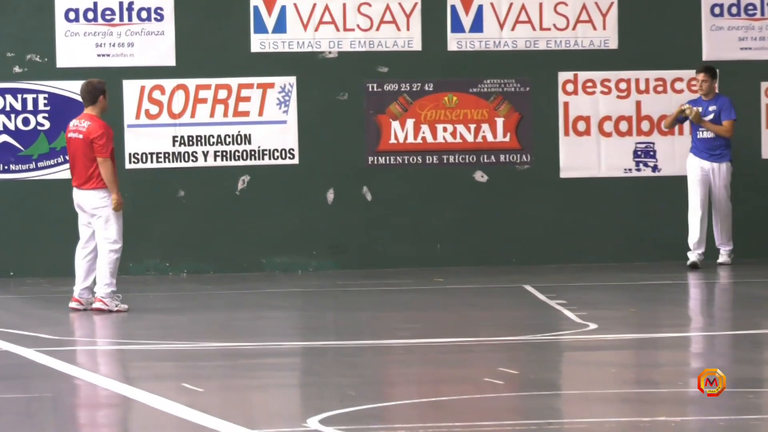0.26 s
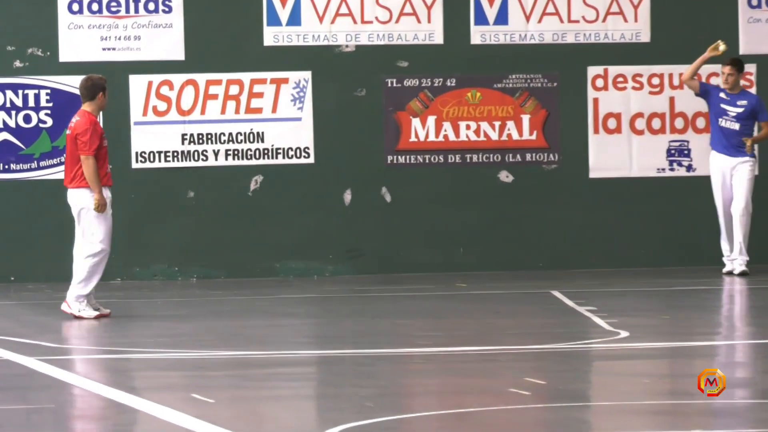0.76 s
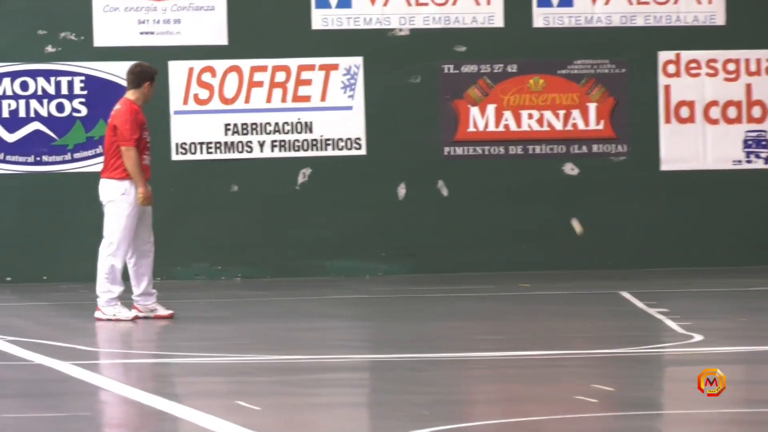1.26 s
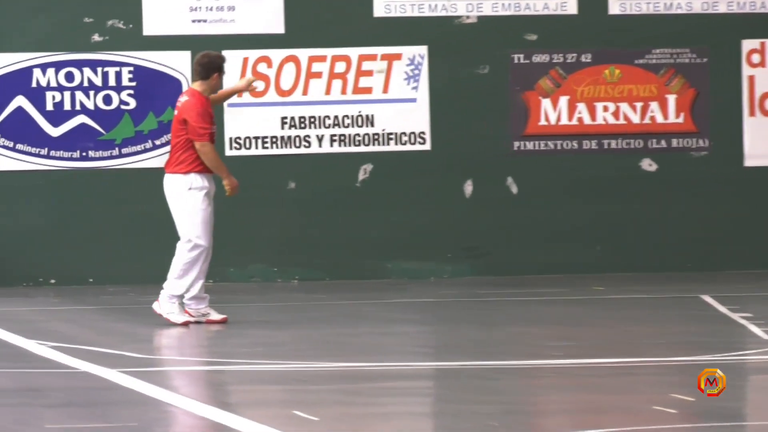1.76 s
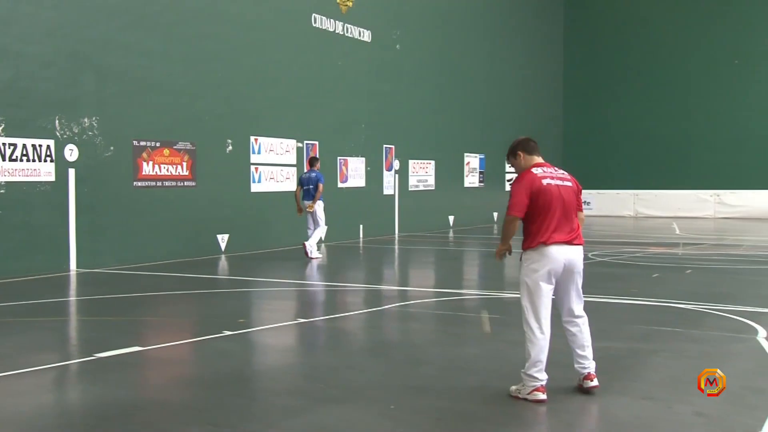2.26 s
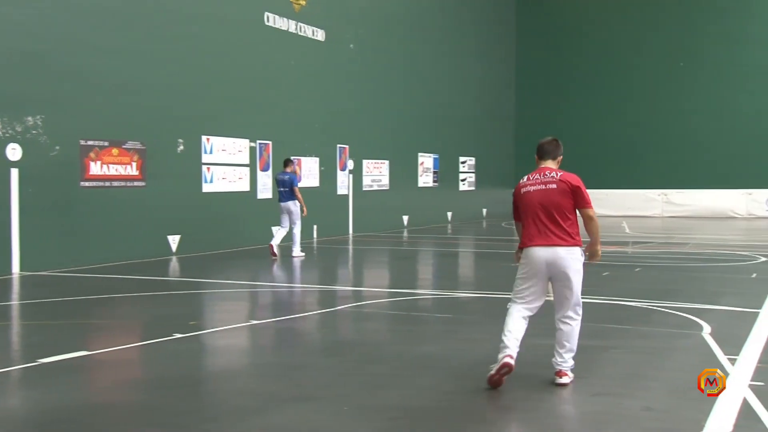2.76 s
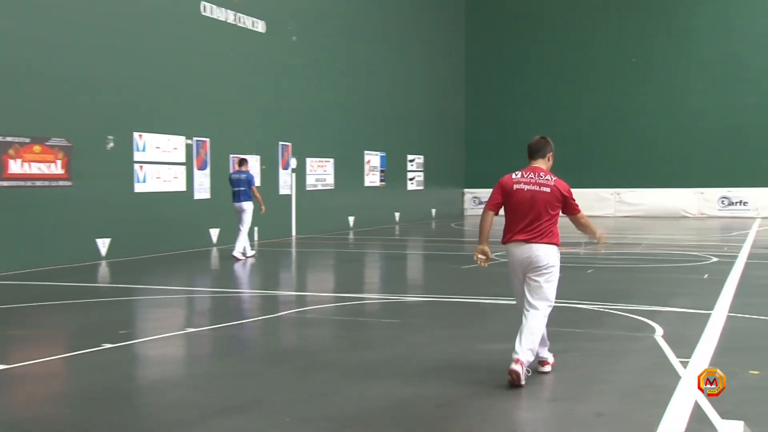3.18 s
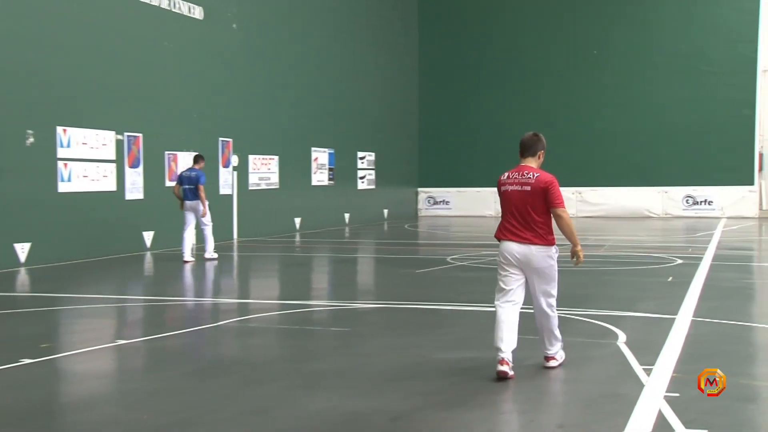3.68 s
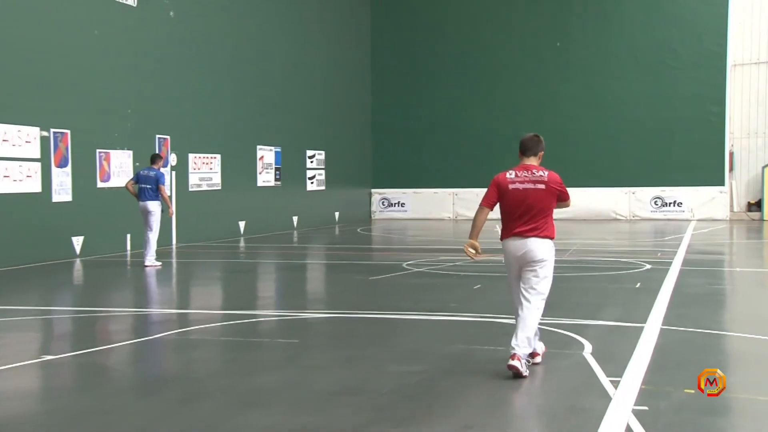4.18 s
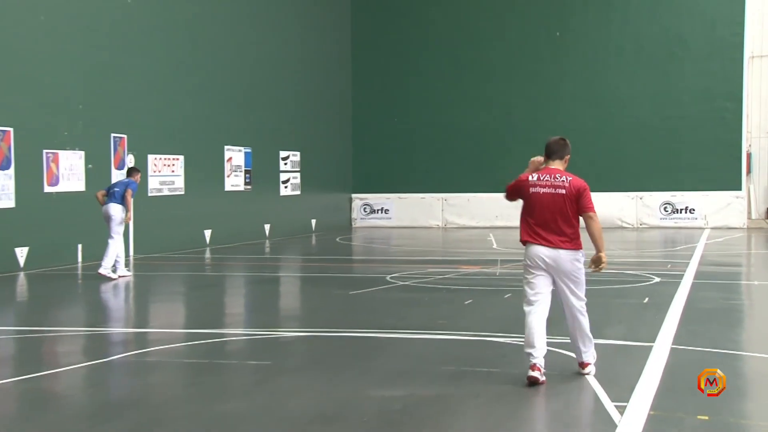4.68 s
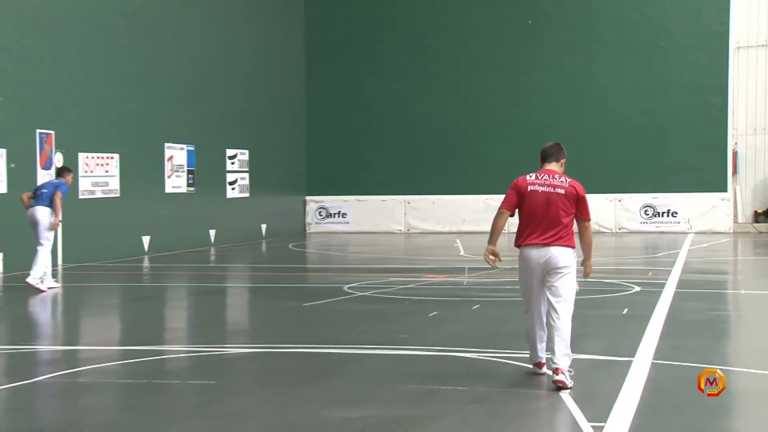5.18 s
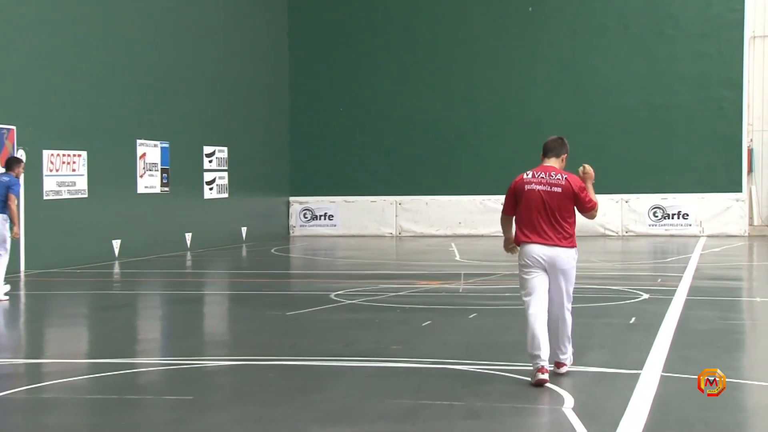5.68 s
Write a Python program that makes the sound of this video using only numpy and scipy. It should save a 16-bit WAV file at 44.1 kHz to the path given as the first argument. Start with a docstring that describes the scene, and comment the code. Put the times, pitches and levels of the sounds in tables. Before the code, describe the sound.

A hard ball bounces seven times on a court floor, each sharp crack echoing and ringing through a very large hall.

```python
"""Seven sharp cracks, each over a low thump: a hard handball bounced in a very large walled court.
The bare walls slap each bounce back, it flutters across the court off the stepped stands with a
falling chirp, and the hall rings for seconds. Soft shoe sounds come before the first bounce.
One microphone, with faint hum, hiss and rumble throughout."""
import sys
import numpy as np
from scipy import signal
from scipy.fft import rfft, irfft, next_fast_len
from scipy.io import wavfile

SR = 44100
rng = np.random.default_rng(int(sys.argv[2]) if len(sys.argv) > 2 else 0)


def store_pcm(level_fs):
    """Save levels as 16-bit WAV."""
    pcm = np.round(np.clip(level_fs, -1, 1) * 32767).astype(np.int16)
    wavfile.write(sys.argv[1], SR, np.atleast_2d(pcm).T)


N = 261513
TIME = np.arange(N) / SR
CUTOFF_HZ = 16000

# Ball on the floor. Each row: start in seconds, force in dB, crack in dB, second snap in dB,
# crack pitch in Hz, bright splash in dB, thump in dB.
BOUNCES = [(1.35, 0, -2, -34, 4190, -38.5, -33), (2.306, -1.56, -6.5, -11, 3900, -42.5, -34.5),
           (2.8030, -2.2, -10, -16, 3980, -44, -26.5), (3.2890, -.5, -5, -7, 3790, -38.5, -29.5),
           (3.840, 2, -5, -6.5, 3970, -28, -31), (4.5023, 1, -11, -10.5, 4420, -33.5, -32.5),
           (5.002, -8.5, -20, -19.5, 4200, -54, -33)]
# Echo delays. Each row, one per bounce: side wall in seconds, stands in seconds.
ECHO_DELAYS = [(.0255, .0575), (.0217, .0607), (.0207, .0588), (.0204, .058), (.021, .0569), (.011, .0547),
               (.02, .0546)]
# Spectrum of a slap off a flat wall. Each row: frequency in Hz, level in dB.
SLAP_COLOUR = [(100, -23), (800, -6.5), (2000, -26), (3000, -3.5), (4300, 7), (5500, -1.5), (7000, -22),
               (8500, -23), (11000, -35), (15000, -86)]


def cracks(lead_s=0.0019, lead_db=-13, snap_s=0.0028, grit_db=-23, grit_t60_s=0.044, nominal_hz=4200,
           smear_s=0.00006, ring_db=-15, ring_t60_s=0.023, ring_rise_s=0.00078):
    """Ball hits floor: a light tick, the main crack, a second snap and a short gritty ring."""
    # Crack spectrum at nominal_hz. Each row: frequency in Hz, level in dB.
    crack_colour = [(100, -35), (400, -11.5), (850, -11), (1300, -12), (2000, -11), (3000, -2), (4200, 7),
                    (5500, -1), (7000, -13), (8500, -19.5), (11000, -28), (15000, -48)]
    out, t = np.zeros(N), TIME[:SR // 10]
    for start_s, _, crack_db, snap_db, pitch_hz, *_ in BOUNCES:
        colour = [(hz * pitch_hz / nominal_hz, db) for hz, db in crack_colour]  # shorter contact: higher
        pulse = click(colour, smear_s)
        ring = np.sin(2 * np.pi * pitch_hz * t) * fade(t, ring_t60_s) * rise(t, ring_rise_s)
        add(out, start_s - lead_s, from_db(crack_db + lead_db) * pulse)
        add(out, start_s, from_db(crack_db) * pulse)
        add(out, start_s + snap_s, from_db(snap_db) * pulse)
        add(out, start_s, from_db(crack_db + ring_db) * ring)
        add(out, start_s, from_db(crack_db + grit_db) * scatter(colour, grit_t60_s))
    return out


def floor_thumps(lead_s=0.00773, rise_s=0.0044, boom_db=-15, boom_t60_s=1.0, boom_rise_s=0.0014,
                 far_s=0.21, far_db=-41, far_t60_s=0.18):
    """A low thump with each bounce, a boom off near walls, then a dull far knock."""
    # Floor modes. Each row: frequency in Hz, level in dB, T60 in seconds.
    floor_modes = [(112, -32, 0.31), (191, -1.5, 0.068), (293, 3.5, 0.05), (353, 3.5, 0.038)]
    # Spectra of the near-wall boom and the dull far-end knock. Each row: frequency in Hz, level in dB.
    boom_colour = [(35, -5.5), (75, 2), (170, -1.5), (380, -3), (700, -5), (3000, -64)]
    far_colour = [(60, -18), (200, 7.5), (330, 10), (500, 8), (900, -19), (1600, -25), (5000, -57)]
    out, t = np.zeros(N), TIME[:SR]
    body = sum(from_db(db) * np.sin(2 * np.pi * hz * t) * fade(t, t60_s) for hz, db, t60_s in floor_modes)
    for start_s, *_, thump_db in BOUNCES:
        add(out, start_s - lead_s, from_db(thump_db) * body * rise(t, rise_s))
        add(out, start_s, from_db(thump_db + boom_db) * scatter(boom_colour, boom_t60_s, boom_rise_s))
        add(out, start_s + far_s, from_db(far_db) * scatter(far_colour, far_t60_s, rise_s))
    return out


def ball_knocks(knock_hz=840, knock_db=-27, t60_s=0.04, rise_s=0.00097):
    """The ball's own short hollow note, scaled with the crack."""
    out, t = np.zeros(N), TIME[:SR // 5]
    note = np.sin(2 * np.pi * knock_hz * t) * fade(t, t60_s) * rise(t, rise_s)
    for start_s, _, crack_db, *_ in BOUNCES:
        add(out, start_s, from_db(crack_db + knock_db) * note)
    return out


def wall_slaps(end_s=0.0412, corner_extra_s=0.0383, corner_db=-21.5, scatter_db=-18, scatter_t60_s=0.029,
               smear_s=0.000092, side_db_per_oct=3, end_db_per_oct=-3):
    """Thin slaps off the side wall, the end wall and, by way of the stands, the corner."""
    # Slap peaks. Each row, one per bounce: side wall in dB, end wall in dB.
    wall_peaks = [(-12, -16), (-17, -29), (-13.5, -26), (-15.5, -11), (-29, -8), (-14, -23), (-30, -15.5)]
    out = np.zeros(N)
    for bounce, (side_s, stands_s), (side_db, end_db) in zip(BOUNCES, ECHO_DELAYS, wall_peaks):
        start_s, force_db, *_ = bounce
        paths = [(side_s, side_db, lifted(SLAP_COLOUR, side_db_per_oct)),
                 (end_s, end_db, lifted(SLAP_COLOUR, end_db_per_oct)),
                 (stands_s + corner_extra_s, force_db + corner_db, SLAP_COLOUR)]
        for delay_s, peak_db, colour in paths:
            add(out, start_s + delay_s, from_db(peak_db) * click(colour, smear_s))
            add(out, start_s + delay_s, from_db(peak_db + scatter_db) * scatter(colour, scatter_t60_s))
    return out


def stray_slaps(first_s=0.03, last_s=0.14, base_db=-22.5, spread_db=3, loss_db_per_s=15,
                lift_db_per_oct=9, smear_s=0.0001, count=10):
    """Beams, ledges and railings throw back small crisp copies of the crack at random delays."""
    out, pulse = np.zeros(N), click(lifted(SLAP_COLOUR, lift_db_per_oct), smear_s)
    for start_s, force_db, *_ in BOUNCES:
        for _ in range(count):
            delay_s = rng.uniform(first_s, last_s)
            peak_db = base_db + force_db + rng.uniform(-2 * spread_db, 0) - loss_db_per_s * delay_s
            add(out, start_s + delay_s, from_db(peak_db) * pulse)
    return out


def flutter(round_trip_s=0.0803, trip_loss_db=27, scatter_db=-22, scatter_tracking=0.3,
            scatter_t60_s=0.057, smear_s=0.000063, chirp_loss_db=11, chirp_ratio=0.8,
            wall_mix_per_trip=0.24, trips=3):
    """The crack shuttles between stands and side wall, thinner and with a lower chirp each trip."""
    # Returns off the stands. Each row, one per bounce: first return in dB, second return in dB,
    # chirp in dB, chirp end in Hz, glide time constant in seconds.
    stand_returns = [(-1, -40, -9, 1800, .0046), (-10, -5.5, -34, 2300, 0.0042),
                     (-18, -19, -15, 1400, 0.00294), (-11, -23, -6.5, 1900, 0.00115),
                     (-5, -13, -2, 2400, 0.0008), (-7.5, -10.5, -7.5, 1270, 0.0015),
                     (-45, -49, -11.5, 1100, 0.00158)]
    # Spectrum of the echo off the stands. Each row: frequency in Hz, level in dB.
    echo_colour = [(100, -22), (500, -17.5), (900, 1.5), (1300, -3), (2000, 2), (4500, 7), (5600, 4.5),
                   (6600, -12), (8200, -8.5), (10500, -53), (15000, -44)]
    out = np.zeros(N)
    for (start_s, *_), (_, stands_s), returns in zip(BOUNCES, ECHO_DELAYS, stand_returns):
        first_db, second_db, chirp_db, end_hz, glide_s = returns
        for trip in range(trips):
            travel_s = stands_s + trip * round_trip_s
            arrival_s = start_s + travel_s
            peak_db = second_db - trip_loss_db * (trip - 1) if trip else first_db
            wall_mix = wall_mix_per_trip * trip  # each turn at the side wall adds its colour
            colour = [(hz, (1 - wall_mix) * db + wall_mix * at_hz(SLAP_COLOUR, hz))
                      for hz, db in echo_colour]
            colour = through_air(colour, travel_s)
            chirp = stands_chirp(end_hz * chirp_ratio ** trip, glide_s)
            swarm = scatter(colour, scatter_t60_s)
            add(out, arrival_s, from_db(peak_db) * click(colour, smear_s))
            add(out, arrival_s, from_db(chirp_db - chirp_loss_db * trip) * chirp)
            add(out, arrival_s, from_db(scatter_db + scatter_tracking * peak_db) * swarm)
    return out


def stands_chirp(end_hz, glide_s, start_hz=4700, uneven_db=4.5, uneven_hz=500):
    """Step after step of the stands answers, unevenly and at widening intervals: a rough falling chirp."""
    t = TIME[:SR // 5]
    hz = end_hz + (start_hz - end_hz) * np.exp(-t / glide_s)
    envelope = fade(t, t60_s=9 * glide_s) * rise(t, glide_s)
    wobble = noise([(uneven_hz, 0), (4 * uneven_hz, -90)], len(t))
    return envelope * unit_rms(from_db(uneven_db * wobble)) * np.sin(2 * np.pi * np.cumsum(hz) / SR)


def early_splashes(rise_s=0.0067, t60_s=1.0, grain_db=7):
    """Sizzling early reflections off nearby surfaces, still carrying the crack's treble."""
    # Splash spectrum. Each row: frequency in Hz, level in dB.
    splash_colour = [(300, -22), (2500, -7), (4300, 19.5), (5600, 2), (6700, 2.5), (8300, -4.5),
                     (10500, -16.5), (12500, -30), (15000, -43)]
    out = np.zeros(N)
    for start_s, *_, splash_db, _ in BOUNCES:
        add(out, start_s, from_db(splash_db) * scatter(splash_colour, t60_s, rise_s, grain_db))
    return out


def hall_ring(ring_db=-30, build_s=0.041, early_db=-1, early_t60_s=0.24, lingering_db=-38,
              lingering_age_s=1.7, predelay_s=0.0057, bands=48):
    """Reflections pile into a dense ring; air takes the treble first. Earlier play lingers at the start."""
    # Ring spectrum. Each row: frequency in Hz, level in dB.
    ring_colour = [(60, -10), (130, -15), (280, -7), (500, -7), (850, -4), (1300, -7), (2100, 4),
                   (3000, 4.5), (4300, 4), (5400, -1.5), (6700, -14), (8200, -26.5), (10500, -64.5),
                   (15000, -53)]
    # Ring decay. Each row: frequency in Hz, T60 in seconds.
    decay_times = [(100, 13.6), (300, 6.1), (800, 9.7), (2000, 5.13), (3200, 3.8), (4500, 2.82),
                   (6000, 1.74), (8000, 2), (12000, 0.48)]
    size = next_fast_len(N, True)
    diffuse, hz = rfft(noise(ring_colour, size)), np.fft.rfftfreq(size, 1 / SR)
    edges_hz = np.geomspace(45, CUTOFF_HZ, bands + 1)
    out, coarse_s = np.zeros(N), TIME[::20]
    for low_hz, high_hz in zip(edges_hz, edges_hz[1:]):
        t60_s = at_hz(decay_times, np.sqrt(low_hz * high_hz))
        power = (from_db(lingering_db) * fade(coarse_s + lingering_age_s, t60_s)) ** 2
        for start_s, force_db, *_ in BOUNCES:
            age_s = np.maximum(coarse_s - start_s - predelay_s, 0)
            whole_hall = from_db(ring_db + force_db) * rise(age_s, build_s) * fade(age_s, t60_s)
            near_end = whole_hall * from_db(early_db) * fade(age_s, early_t60_s)  # rings first
            power += whole_hall ** 2 + near_end ** 2
        band = irfft(diffuse * ((hz >= low_hz) & (hz < high_hz)), size)[:N]
        out += band * np.interp(TIME, coarse_s, np.sqrt(power))
    return out


def shoes(step_s=0.18, step_hz=220, step_db=-47, step_width_s=0.0044, squeak_s=0.475, squeak_db=-61,
          squeak_width_s=0.036, scuff_t60_s=5.1, scuff_rise_s=0.0091):
    """One soft footfall, a thin squeak, and sole scuffs drawn out by the hall."""
    # Soles on the floor. Each row: start in seconds, level in dB.
    scuffs = [(.04, -63), (.42, -62)]
    step = np.sin(2 * np.pi * step_hz * TIME) * np.exp(-((TIME - step_s) / step_width_s) ** 2)
    squeak = noise([(4500, -50), (5400, -16), (5600, -6), (5800, -18), (7000, -50)], N)
    squeak *= np.exp(-((TIME - squeak_s) / squeak_width_s) ** 2)
    out = from_db(step_db) * step + from_db(squeak_db) * squeak
    for start_s, db in scuffs:
        rub = noise([(500, -8), (3000, -1.5), (4200, 0.5), (5800, -6), (7000, -16), (12000, -32)], N)
        add(out, start_s, from_db(db) * rub * fade(TIME, scuff_t60_s) * rise(TIME, scuff_rise_s))
    return out


def hall_drones():
    """Faint, narrow, wavering hums of the empty hall."""
    # Each row: centre in Hz, width in Hz, level in dB.
    hums = [(269, 26, -69), (884, 48, -76)]
    out = np.zeros(N)
    for hz, width_hz, db in hums:
        colour = [(hz - 2 * width_hz, -40), (hz, 0), (hz + 2 * width_hz, -40), (2 * hz, -80)]
        out += from_db(db) * noise(colour, N)
    return out


def background(noise_db=-56.5, mains_hz=50, mains_db=-65, whine_hz=15625, whine_db=-73):
    """Building rumble and hiss, mains hum and a thin electronic whine."""
    # Spectrum of rumble and hiss. Each row: frequency in Hz, level in dB.
    noise_colour = [(27, 1), (37, -30), (57, 6.5), (78, -12), (100, -6), (180, -5.5), (260, -9),
                    (340, -10.5), (840, -17), (1300, -18), (2200, -20.5), (7000, -27.5), (10500, -29),
                    (15000, -30)]
    mains = from_db(mains_db) * np.sin(2 * np.pi * mains_hz * TIME)
    whine = from_db(whine_db) * np.sin(2 * np.pi * whine_hz * TIME)
    return from_db(noise_db) * noise(noise_colour, N) + mains + whine


def click(colour, smear_s=0, size=1024):
    """Minimum-phase pulse of a given colour, peak 1; a rough path rounds its front over smear_s."""
    cepstrum = irfft(np.log(from_db(at_hz(colour, np.fft.rfftfreq(size, 1 / SR)))))
    cepstrum[size // 2:] = 0
    cepstrum[0] = 0
    pulse = irfft(np.exp(rfft(2 * cepstrum)))
    if smear_s > 0:
        strongest_hz = max(colour, key=lambda point: point[1])[0]
        radius = np.exp(-1 / (smear_s * SR))
        denominator = [1, -2 * radius * np.cos(2 * np.pi * strongest_hz / SR), radius ** 2]
        pulse = signal.lfilter(denominator[::-1], denominator, pulse)  # all-pass
    return pulse / np.abs(pulse).max()


def scatter(colour, t60_s, rise_s=0.000083, grain_db=0):
    """A swarm of tiny uneven reflections that swells and dies; rms 1 before the envelope."""
    t, pulse = TIME[:SR], click(colour)
    swarm = unit_rms(rng.standard_normal(SR) * from_db(grain_db * rng.standard_normal(SR)))
    swarm *= fade(t, t60_s) * rise(t, rise_s)
    return signal.fftconvolve(swarm, pulse / np.linalg.norm(pulse))


def noise(colour, size):
    """Steady noise of a given colour, rms 1."""
    padded = next_fast_len(size, True)
    gain = from_db(at_hz(colour, np.fft.rfftfreq(padded, 1 / SR)))
    return unit_rms(irfft(rfft(rng.standard_normal(padded)) * gain, padded)[:size])


def through_air(colour, travel_s, loss_db_per_s=45, reference_hz=8000):
    """Air absorbs an echo's treble all along its path."""
    return [(hz, db - loss_db_per_s * travel_s * (hz / reference_hz) ** 2) for hz, db in colour]


def lifted(colour, db_per_oct, from_hz=4500):
    """A colour with its treble tilted above from_hz."""
    return [(hz, db + db_per_oct * max(np.log2(hz / from_hz), 0)) for hz, db in colour]


def at_hz(points, hz):
    """Reads a table on a log-frequency axis."""
    points_hz, values = np.transpose(points)
    return np.interp(np.log(np.maximum(hz, 1)), np.log(points_hz), values)


def add(track, start_s, sound):
    """Mixes a sound into the track from start_s on."""
    start = max(round(start_s * SR), 0)
    part = sound[:max(N - start, 0)]
    track[start:start + len(part)] += part


def rise(t, rise_s):
    return 1 - np.exp(-t / rise_s)


def fade(t, t60_s):
    return from_db(-60 * t / t60_s)


def from_db(db):
    return 10 ** (np.asarray(db) / 20)


def unit_rms(x):
    return x / np.sqrt(np.mean(x ** 2) + 1e-20)


def scene():
    """Ball, echoes and background at one microphone, alike in both channels."""
    ball = cracks() + floor_thumps() + ball_knocks()
    echoes = wall_slaps() + stray_slaps() + flutter() + early_splashes() + hall_ring()
    mono = ball + echoes + shoes() + hall_drones() + background()
    return np.array([mono, mono])


def record(dry):
    """Steep low-pass at CUTOFF_HZ."""
    return signal.sosfilt(signal.ellip(10, 0.1, 70, CUTOFF_HZ, fs=SR, output="sos"), dry)


dry = scene()
out = record(dry)
store_pcm(out)
```